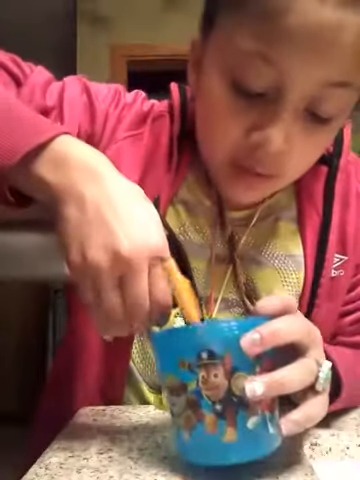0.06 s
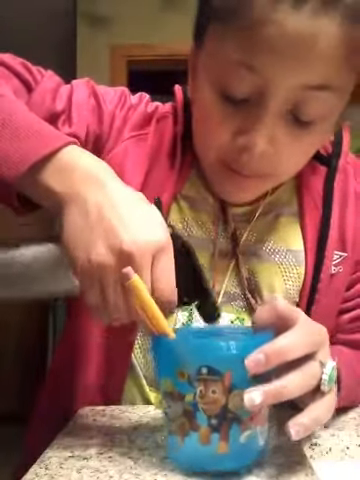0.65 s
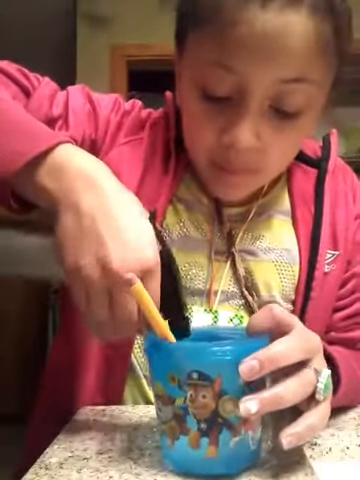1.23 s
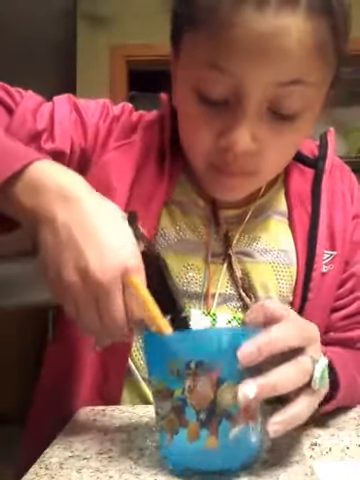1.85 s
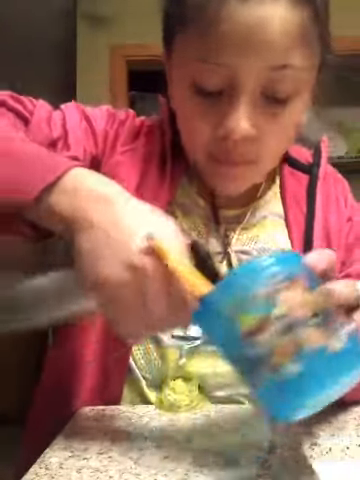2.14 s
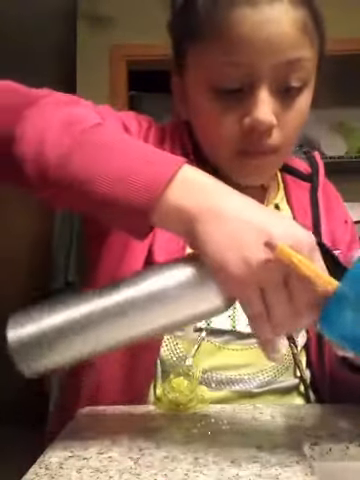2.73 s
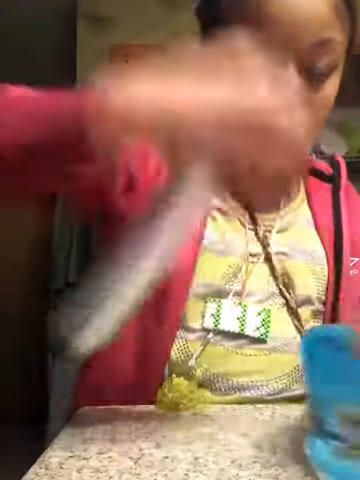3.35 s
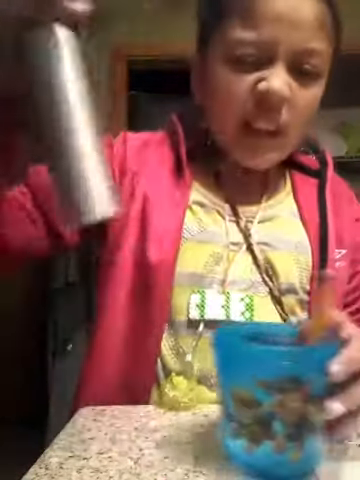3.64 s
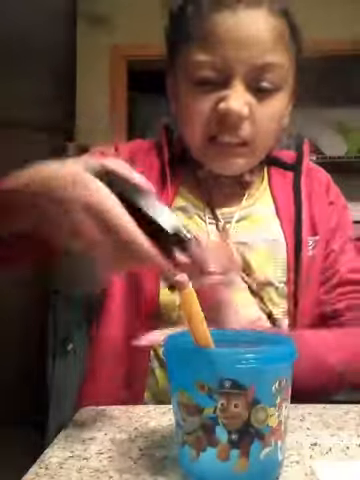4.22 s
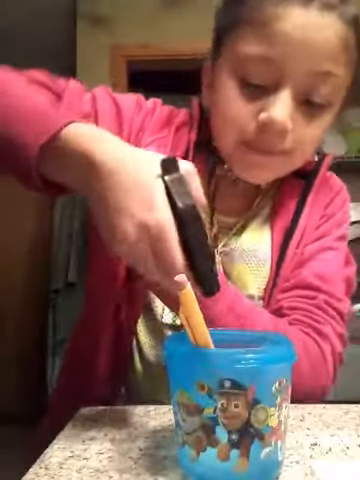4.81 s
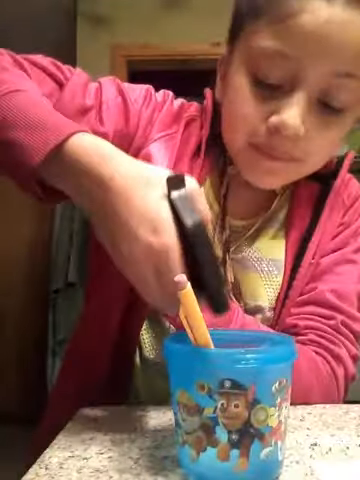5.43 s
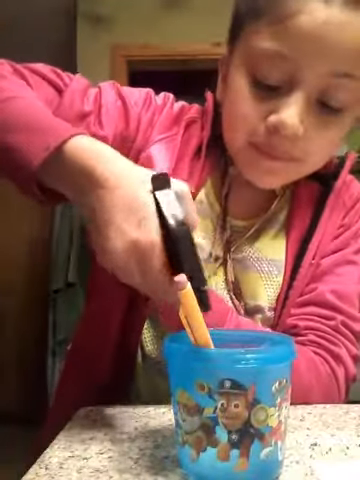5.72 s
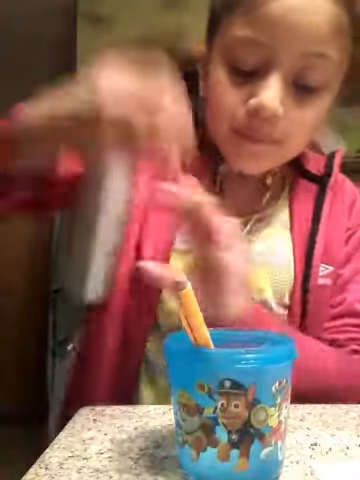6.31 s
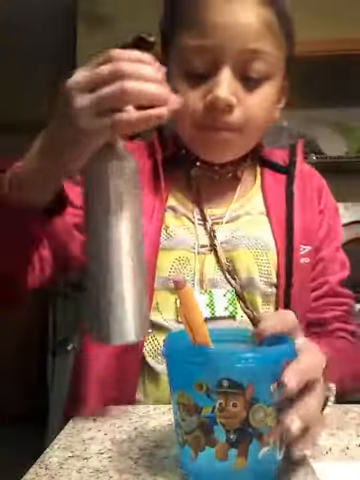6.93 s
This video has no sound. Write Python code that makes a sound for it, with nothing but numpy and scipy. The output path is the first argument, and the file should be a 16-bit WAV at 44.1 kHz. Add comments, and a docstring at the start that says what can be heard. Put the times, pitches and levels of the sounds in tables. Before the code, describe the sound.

Short, hissing spray bursts and hollow knocks come from a plastic cup as slime is mixed, with clicks and soft taps in between. The cup lands hard on a stone counter and grinds briefly over it. The rest is quieter: scattered sticky pops, plastic clicks, thin fizzes from the spray bottle and faint brushing of hands. Everything is close to a phone microphone, with a little kitchen reverberation.

```python
"""Slime is mixed in a plastic cup on a stone kitchen counter, close to a phone.
First, over a soft rush, the cup knocks and hoots hollowly; short spray bursts rasp into it, trigger and
cup click and sticky spots pop. At 3.5 s the cup is set down hard and dragged back. Then pops and clicks
go on as the spray bottle is gripped and squeezed. The kitchen reverberates throughout."""
import sys
import numpy as np
from scipy import signal
from scipy.fft import rfft, irfft, next_fast_len
from scipy.io import wavfile

SR = 44100
rng = np.random.default_rng(int(sys.argv[2]) if len(sys.argv) > 2 else 0)


def waveform_to_disk(signal):
    """Save audio, clipped to [-1, 1], as 16-bit WAV at the path in sys.argv[1]."""
    frames = np.transpose(np.atleast_2d(signal))
    scaled = np.clip(frames, -1, 1) * 32767
    samples = np.round(scaled).astype(np.int16)
    wavfile.write(sys.argv[1], SR, samples)


N = 315781
TIME_S = np.arange(N) / SR
EVENT_S = np.arange(int(SR * 0.4)) / SR  # time axis of one short event


def knocks(hoot_t60_s=0.021, linger_t60_s=0.34, beat_hz=32, echo_s=0.029, echo_db=-13.5):
    """The cup's air hoots, its wall and rim ring, the counter thuds; two close air modes linger."""
    # Each row: start in s, level in dB, hoot in Hz, then hoot, rim, thud and crack in relative dB.
    blows = [(0.3107, -15.5, 953, 4, -6, 8, -43), (0.4811, -5, 951, 3, -1.5, -3, -38.5),
             (0.7434, -2.5, 979, 1.5, -11.5, 0, -31), (1.2519, -6.5, 997, -16, -18, 3, -11.5),
             (2.4043, -14, 917, -6, -37, -3, -26.5), (3.4836, -0.5, 956, 2.5, -13.5, 4, -24.5)]
    # Modes of cup wall and counter. Each row: frequency in Hz, level in dB, t60 in s.
    cup_modes = [(570, -21, 0.063), (785, -28, .09), (1010, -27.5, 0.017), (1280, -13, 0.008),
                 (1720, -10, 0.013), (2055, -6, 0.013), (2307, -9.5, 0.024), (2883, -14.5, .02)]
    counter_modes = [(112, -31.5, 0.11), (148.8, -35, .1), (198, -39, 0.049), (340, -30.5, 0.084),
                     (539, -35, 0.15)]
    out = np.zeros(N)
    soft = signal.butter(4, 3400, fs=SR, output="sos")  # plastic gives on contact
    for s, db, hz, hoot_db, rim_db, thud_db, crack_db in blows:
        tone = sine(hz)
        hoot = signal.sosfilt(soft, 1.22 * tone * decay(hoot_t60_s) * attack(0.0006))
        beating = tone + 0.51 * sine(hz - beat_hz)
        linger = amp(-18) * beating * decay(linger_t60_s) * attack(0.013)
        wall = ringing(cup_modes)
        rim = ringing([(1450, rim_db, 0.024)])
        thud = amp(thud_db) * ringing(counter_modes)
        crack = amp(crack_db) * noise(len(EVENT_S)) * decay(0.033)
        blow = signal.sosfilt(soft, wall + rim + thud) + crack
        add(out, s, amp(db) * kitchen(blow, wet_db=-9.5, gap_s=0.0016))
        add(out, s, amp(db + hoot_db) * kitchen(hoot, wet_db=-4))
        add(out, s + echo_s, amp(db + hoot_db + echo_db) * hoot)  # off a nearby wall
        add(out, s, amp(db + hoot_db) * linger)
    return out


def clicks(ring_width_hz=700, gain_db=-15):
    """Trigger and rim contacts ring the plastic, with a dull knock and a bright tick."""
    # Each row: start in s, ring in Hz, level in dB before gain_db, then knock and tick in relative dB.
    contacts = [(.097, 2300, -37, -13, -30.5), (.397, 2530, -45.5, -6, -2), (.815, 2200, -35.5, -14, -34.5),
                (1.2494, 2700, -21.5, -15, -7), (1.53, 2230, -56, -20, 9), (1.773, 2080, -46.5, -22.5, -2),
                (1.905, 2270, -49.5, -10, -0.5), (2.051, 2630, -47, -1, -22),
                (2.4053, 2540, -21.5, -12, -26.5), (2.691, 2370, -41, -3, -14),
                (3.307, 2600, -36.5, -11, -6.5), (3.34, 2160, -40, -17, -4.5),
                (3.608, 2370, -29, -6.5, -15), (3.782, 2900, -30, -5.5, -19),
                (3.872, 2520, -22, -21.5, -15), (3.983, 2410, -32, -22, -5), (4.075, 2480, -36, -15.5, -8),
                (4.15, 1820, -38, -12, -13), (4.202, 2280, -42.5, -10.5, -10),
                (4.344, 3650, -46, -19.5, -11.5), (4.459, 2400, -45, -20, 4.5), (5.015, 2080, -41, -6, -16),
                (5.221, 2400, -46.5, -16, -11.5), (5.484, 2190, -49, -12, -3.5),
                (5.732, 2220, -51.5, -19, -6.5), (6.077, 2130, -50.5, -10, 2), (6.275, 2205, -54, -9, 1.5),
                (6.442, 2620, -42, -22, -13.5), (6.513, 4420, -57, -7, 13.5),
                (6.598, 2700, -40.5, -22, -6.5), (6.708, 2560, -45.5, -11, -5),
                (6.814, 2400, -41.5, -20.5, -14.5), (7.076, 2610, -47, -6, -22)]
    out = np.zeros(N)
    for s, hz, db, knock_db, tick_db in contacts + fidgets():
        ring = resonate(chatter(0.027), [(hz, ring_width_hz, 0), (2300, 1800, -7)])
        knock = resonate(chatter(0.06), [(130, 37, -9), (383, 1200, -4), (983, 330, 4), (1854, 1500, -4)])
        tick = resonate(chatter(0.02), [(6000, 1100, -29.5), (7860, 5400, 18), (14470, 5000, -16)])
        click = ring + amp(knock_db) * knock + amp(tick_db) * tick
        add(out, s, amp(db + gain_db) * kitchen(click, wet_db=-5, gap_s=0.0021, build_s=0.0029))
    return out


def fidgets(ring_hz=2400, knock_db=-14, tick_db=-5):
    """Rows for lighter clicks, at random while things are moved about."""
    # Each row: start in s, end in s, click count, level in dB before the clicks' gain.
    spells = [(3.1, 3.301, 4, -48.5), (6.28, 6.349, 2, -51.5), (6.7, 6.801, 3, -46.5)]
    rows = []
    for start_s, end_s, count, db in spells:
        for k in range(count):
            s = start_s + (end_s - start_s) * (k + rng.random()) / count
            hz = ring_hz * np.exp(0.067 * rng.normal())
            rows.append((s, hz, db + 2 * rng.normal(), knock_db, tick_db))
    return rows


def pops(rise_s=0.0043, roughness=0.57, gain_db=-3):
    """A sticky spot lets go: a brief, slightly rough tone swells and dies."""
    # Each row: start in s, level in dB before gain_db, pitch in Hz.
    releases = [(0.281, -34, 2345), (1.974, -44, 4370), (2.065, -42.5, 4030), (2.603, -27.5, 2116),
                (2.877, -32.5, 2016), (3.455, -18, 2900), (3.967, -20.5, 2705), (4.114, -21, 2442),
                (4.832, -32.5, 2477), (5.105, -43, 2045), (5.134, -36.5, 2350), (5.437, -31.5, 2257),
                (5.619, -42, 2214), (5.903, -27, 2180), (6.395, -38.5, 3950), (6.416, -41, 4040),
                (6.878, -28.5, 2496), (6.919, -38.5, 2395)]
    out = np.zeros(N)
    age = EVENT_S / rise_s
    envelope = age ** 2 * np.exp(2 - 2 * age)
    for s, db, hz in releases:
        rough = resonate(noise(len(EVENT_S)), [(hz, 850, 0), (4200, 1500, -14), (7500, 2500, -20)])
        pop = envelope * (sine(hz) + roughness * rough)
        add(out, s, amp(db + gain_db) * kitchen(pop, wet_db=-6.5, gap_s=0.0041, build_s=0.0081))
    return out


def taps(t60_s=0.043):
    """A soft fingertip stirs only the air in the cup."""
    # Each row: start in s, level in dB, pitch in Hz.
    touches = [(.117, -30, 962), (2.094, -31, 858), (2.372, -34, 892), (2.648, -23.5, 887),
               (3.24, -33.5, 956), (6.706, -33, 761)]
    out = np.zeros(N)
    for s, db, hz in touches:
        hoot = sine(hz) * decay(t60_s) * attack(0.0016)
        add(out, s, amp(db) * kitchen(hoot, wet_db=-5))
    return out


def sprays(impulses_per_s=700, grain_db=3, air_db=-39, air_db_per_db=0.27):
    """Short rasping, hissing spray bursts into the cup; the cup's air resonates."""
    # Each row: start in s, length in s, rasp level in dB, hiss in relative dB.
    bursts = [(0.458, 0.081, -48, -0.5), (0.651, .081, -42, -4.5), (0.9, 0.021, -40, -6.5),
              (.92, 0.025, -27.5, -15.5), (1.043, .085, -39.5, -0.5), (1.228, 0.035, -38.5, -4),
              (1.255, 0.07, -39.5, 0.5), (1.359, 0.065, -35.5, -2.5), (1.559, 0.028, -34, -9),
              (1.605, 0.022, -31.5, -4), (1.913, 0.031, -44.5, -8), (2.094, 0.037, -47, -1.5),
              (2.417, 0.036, -47, 1), (2.484, 0.052, -43, -4), (2.629, 0.056, -45, -6),
              (2.786, 0.085, -41.5, 0), (2.956, .057, -57.5, -9.5), (3.098, 0.056, -46, -7.5),
              (3.274, 0.053, -39.5, -12.5), (3.383, 0.12, -47, -10), (3.586, 0.035, -35.5, 2.5),
              (3.686, 0.029, -31, 0.5)]
    # Resonances of the rasp and the cup's air. Each row: centre in Hz, width in Hz, level in dB.
    rasp_modes = [(2360, 600, -11.5), (2621, 400, -1.5), (3950, 140, -13), (7600, 340, -17.5)]
    air_modes = [(516.5, 300, -10), (930, 194, 1.5)]
    # Each row: frequency in Hz, level in dB.
    hiss_spectrum = [(1500, -21), (3000, -17.5), (4000, -3), (4800, -6), (6000, 2.5), (7000, 0.5),
                     (8000, 5), (10000, -2.5), (16000, -10.5)]
    out, size = np.zeros(N), len(EVENT_S)
    for s, length_s, db, hiss_db in bursts:
        progress = np.minimum(EVENT_S / length_s, 1)
        envelope = np.sqrt(2) * np.abs(np.sin(np.pi * progress ** 0.77)) ** 0.84  # peaks early
        grain = unit(amp(grain_db * coloured(noise(size), [(120, 0), (300, -30), (800, -90)])))
        rasp = amp(db) * resonate(slips(size, impulses_per_s, spread_db=1.5), rasp_modes)
        hiss = amp(db + hiss_db) * coloured(grain * noise(size), hiss_spectrum)
        air = amp(air_db + air_db_per_db * db) * resonate(noise(size), air_modes)
        burst = envelope * (rasp + hiss + air)
        add(out, s, kitchen(burst, wet_db=-6.5, gap_s=0.003, build_s=0.0015))
    return out


def drag(grit_db=-3, catch_db=-4, judder_db=3):
    """The cup's base grinds over the stone in uneven pushes and catches."""
    # Each row: time in s, level in dB.
    slide = [(3.5, -27.5), (3.58, -48.5), (3.69, -34), (3.79, -29), (3.841, -34), (3.88, -27),
             (3.95, -43.5), (4.12, -41), (4.32, -63)]
    # Each row: frequency in Hz, level in dB.
    grit_spectrum = [(60, -26.5), (110, -2.5), (350, -9.5), (550, -2.5), (900, -1.5), (1500, -19),
                     (2100, 11.5), (2700, 11), (3400, 1), (5000, -3), (7800, 0.5), (10000, -3.5),
                     (16000, -8.5)]
    judder = amp(judder_db * coloured(noise(N), [(50, 0), (150, -30), (400, -90)]))
    grit = amp(grit_db) * coloured(slips(N, per_s=3500, spread_db=3) * judder, grit_spectrum)
    catches = crinkles(slide[0][0], slide[-1][0], per_s=700, centre_hz=2800, cycles=1.6, spread_db=19)
    return kitchen(level(slide) * (grit + amp(catch_db) * catches), wet_db=-5.5)[:N]


def squeezes(fizz_db=-2, spring_db=-5):
    """Each squeeze of the spray bottle starts a thin wet fizz and rings the trigger's spring."""
    # Each row: peak time in s, level in dB, spring pitch in Hz.
    pulls = [(2.799, -46, 5900), (5.737, -62, 6500), (5.915, -43.5, 6170), (6.096, -48.5, 5480)]
    # Each row: centre in Hz, width in Hz, level in dB.
    fizz_bands = [(4280, 5100, -7.5), (5830, 1300, -7), (6000, 1100, -4), (7400, 5900, -10.5)]
    out = np.zeros(N)
    for s, db, hz in pulls:
        fizz = amp(fizz_db) * resonate(slips(N, per_s=8000, spread_db=6), fizz_bands)
        spring = amp(spring_db) * resonate(noise(N), [(hz, 260, 0), (7900, 200, -7)])
        out += swell(s, db, rise_s=0.0085, fall_s=0.14) * (fizz + spring)
    return kitchen(out, wet_db=-7)[:N]


def handling(rise_share=0.3):
    """Sleeve and hands brush cup and bottle; carrying the cup rumbles."""
    # Each row: peak time in s, level in dB, fall time in s.
    brushes = [(2.119, -44.5, 0.32), (2.4, -53.5, 1.2), (3.47, -47, 1), (5.04, -51, 0.2),
               (6.441, -58.5, .25), (6.72, -53, 0.12), (6.89, -55.5, 0.098), (7.121, -57.5, .4)]
    # Peak time in s, level in dB.
    carry = (2.654, -49.5)
    # Each row: frequency in Hz, level in dB.
    cloth_spectrum = [(60, -3), (130, -1.5), (450, 1.5), (850, 2.5), (1300, -9.5), (1900, -0.5), (2400, 14),
                      (3300, -7.5), (5000, -11.5), (7500, -10.5), (10000, -20), (16000, -10.5)]
    rumble_spectrum = [(50, -21.5), (90, -2.5), (140, -1.5), (185, -1.5), (240, -14), (400, -37.5)]
    moves = sum(swell(s, db, rise_share * fall_s, fall_s) for s, db, fall_s in brushes)
    brush = moves * coloured(slips(N, per_s=2700, spread_db=7.5), cloth_spectrum)
    rumble = swell(*carry, rise_s=0.46, fall_s=0.5) * coloured(noise(N), rumble_spectrum)
    return kitchen(brush + rumble, wet_db=-7.5)[:N]


def grip():
    """Skin and sleeve catch on the bottle in a faint crackle as the grip shifts."""
    # Each row: peak time in s, level in dB.
    shifts = [(4.4, -56), (4.47, -55), (6.149, -55), (6.439, -53), (6.6, -54), (6.725, -48.5)]
    envelope = sum(swell(s, db, rise_s=0.063, fall_s=0.12) for s, db in shifts)
    start_s, end_s = shifts[0][0] - 0.2, shifts[-1][0] + 0.26
    crackle = crinkles(start_s, end_s, per_s=2500, centre_hz=4560, cycles=1.4, spread_db=2.5)
    return kitchen(envelope * crackle, wet_db=-9)[:N]


def background(room_db=-59.5):
    """Quiet room tone, with a soft rush at first."""
    # Each row: time in s, level in dB.
    rush_levels = [(0, -45), (.4, -45), (.7, -52.5), (1.2, -48), (1.9, -61), (2.2, -97)]
    # Each row: frequency in Hz, level in dB.
    room_spectrum = [(25, -7.5), (45, -6.5), (100, -9), (150, -5), (220, -15.5), (400, -17.5),
                     (1000, -20.5), (1600, -26.5), (2400, -9.5), (3300, -23.5), (5000, -32.5),
                     (7500, -30.5), (10000, -23), (15800, -32)]
    rush_spectrum = [(60, -2), (120, -4.5), (300, -5.5), (1000, -5), (1600, -13), (2100, 2.5), (2600, 6),
                     (3200, -9.5), (4400, -10), (5000, -22.5), (8000, -28), (12000, -32.5)]
    room_tone = amp(room_db) * coloured(noise(N), room_spectrum)
    return room_tone + level(rush_levels) * coloured(noise(N), rush_spectrum)


def kitchen(x, wet_db, gap_s=0.0052, build_s=0.0027):
    """x plus reverberation that builds after a gap and dies band by band."""
    # Each row: frequency in Hz, t60 in s.
    reverb_times = [(120, .4), (500, 0.43), (1000, 0.31), (2500, 0.16), (7000, 0.47), (15000, 0.12)]
    hz, s, bands = signal.stft(noise(SR // 2), SR, nperseg=256)
    t60_s = along(reverb_times, hz)[:, None]
    response = signal.istft(bands * np.exp(-np.log(1000) * s / t60_s), SR, nperseg=256)[1]
    response *= np.clip((np.arange(len(response)) / SR - gap_s) / build_s, 0, 1)
    response *= amp(wet_db) / np.linalg.norm(response)
    response[0] = 1  # direct sound
    return signal.fftconvolve(x, response)


def ringing(modes):
    """Struck (Hz, dB, t60 s) modes, at new strengths for each blow."""
    return sum((-1) ** k * amp(db + 1.7 * noise(1)) * sine(hz) * decay(t60_s)
               for k, (hz, db, t60_s) in enumerate(modes))


def chatter(t60_s):
    """A contact: an impulse, then a short rattle."""
    burst = noise(len(EVENT_S)) * decay(t60_s)
    burst[0] = 4
    return burst


def slips(size, per_s, spread_db):
    """Random impulses of uneven size, at rms 1."""
    happens = rng.random(size) < per_s / SR
    return unit(happens * np.sign(noise(size)) * amp(spread_db * np.clip(noise(size), -2, 2)))


def crinkles(start_s, end_s, per_s, centre_hz, cycles, spread_db):
    """Tiny catches, each ringing at its own pitch; rms 1 while they last."""
    out, s = np.zeros(N), EVENT_S[:SR // 50]
    span_s = end_s - start_s
    for when, pitch, size in rng.random((int(per_s * span_s), 3)):
        hz = centre_hz * 2 ** (3.4 * (pitch - 0.5))
        age = s * np.sqrt(hz * centre_hz) / cycles
        ping = np.sin(2 * np.pi * hz * s) * age * np.exp(-age)
        add(out, start_s + when * span_s, amp(spread_db * size ** 3) * ping)
    return unit(out) * np.sqrt(span_s / (N / SR))


def resonate(x, modes):
    """x through steep-sided (Hz, width Hz, dB) resonances, at rms 1."""
    def response(hz):
        return sum(amp(db) * (1j * hz * width / (centre ** 2 - hz ** 2 + 1j * hz * width)) ** 2
                   for centre, width, db in modes)
    return unit(filtered(x, response))


def coloured(x, spectrum):
    """x through a (Hz, dB) spectrum, at rms 1."""
    return unit(filtered(x, lambda hz: amp(along(spectrum, hz))))


def filtered(x, response):
    """x through a frequency response."""
    size = next_fast_len(len(x) + SR // 4)
    return irfft(rfft(x, size) * response(np.fft.rfftfreq(size, 1 / SR)), size)[:len(x)]


def along(points, hz):
    """Interpolate (Hz, value) points on a log axis."""
    points_hz, values = np.transpose(points)
    return np.interp(np.log(hz + 1), np.log(points_hz + 1), values)


def level(rows):
    """Gain per sample from (s, dB) rows, silent outside them."""
    s, db = np.transpose(rows)
    return amp(np.interp(TIME_S, s, db, left=-140, right=-140))


def swell(s, db, rise_s, fall_s):
    """Gain peaking at s: up 20 dB in rise_s, down 20 dB in fall_s."""
    return amp(db - 20 * np.maximum((s - TIME_S) / rise_s, (TIME_S - s) / fall_s))


def attack(tau_s):
    return 1 - np.exp(-EVENT_S / tau_s)


def decay(t60_s):
    return np.exp(-np.log(1000) * EVENT_S / t60_s)


def sine(hz):
    return np.sin(2 * np.pi * hz * EVENT_S)


def noise(size):
    return rng.standard_normal(size)


def amp(db):
    return 10 ** (np.asarray(db) / 20)


def unit(x):
    """Scale to rms 1."""
    return x / np.sqrt(np.mean(x ** 2) + 1e-20)


def add(track, s, x):
    """Mix x into the track at s seconds."""
    part = track[max(round(s * SR), 0):][:len(x)]
    part += x[:len(part)]


def scene():
    """All sources, in mono."""
    mix = background() + knocks() + clicks() + pops() + taps() + sprays()
    return (mix + handling() + squeezes() + drag() + grip())[None]


def record(dry, top_hz=15900):
    """The phone rounds the loudest peaks, cuts deep bass, notches the top octave and limits the band."""
    # Each row: frequency in Hz, gain in dB.
    microphone = [(25, -17.5), (42, -18), (65, -6), (90, -0.5), (8200, -6), (9200, -22.5), (10500, -29),
                  (11500, -31), (12800, -22), (14200, -10.5), (15800, -13.5)]
    rounded = dry[0] / (1 + np.abs(dry[0]) ** 6) ** (1 / 6)
    return filtered(rounded, lambda hz: amp(along(microphone, hz)) * (hz < top_hz))[None]


dry = scene()
out = record(dry)
waveform_to_disk(out)
```